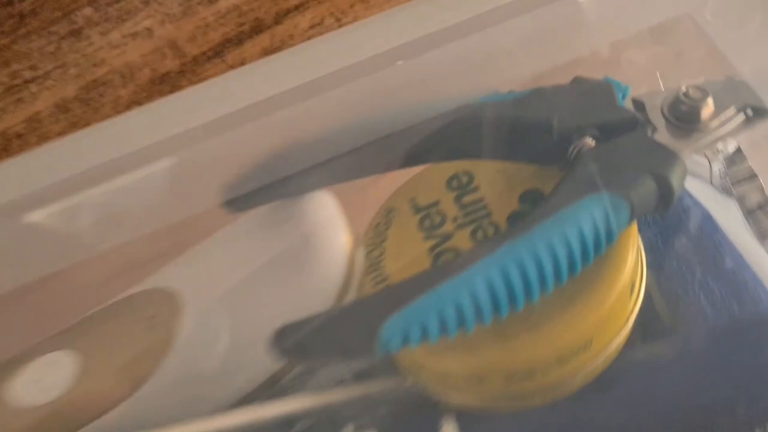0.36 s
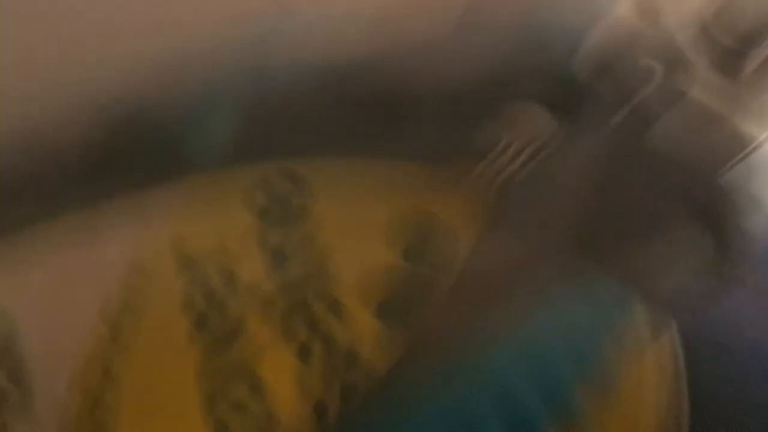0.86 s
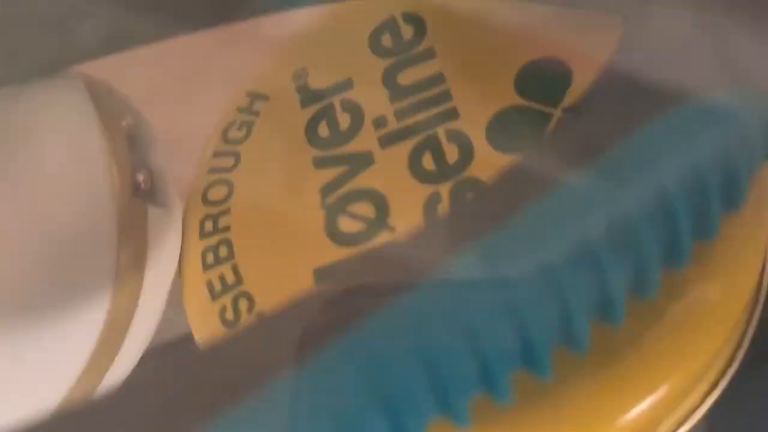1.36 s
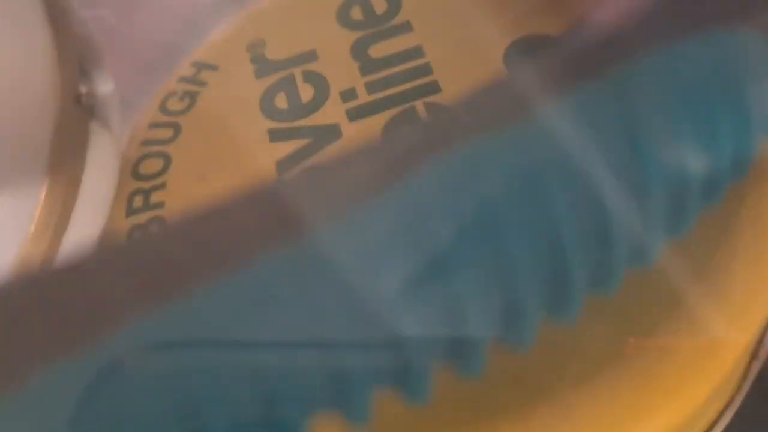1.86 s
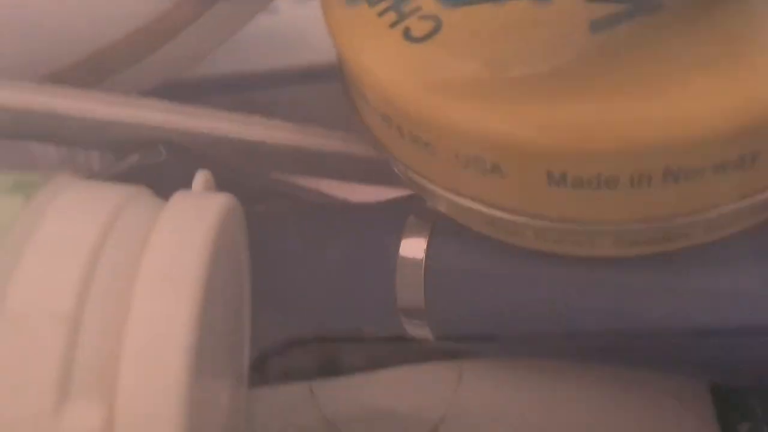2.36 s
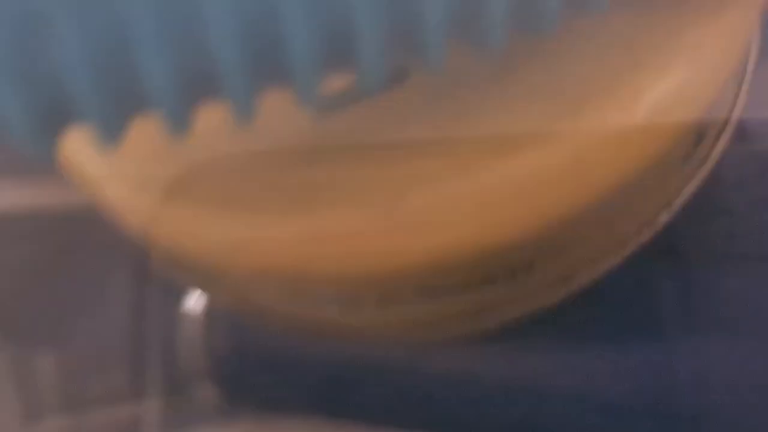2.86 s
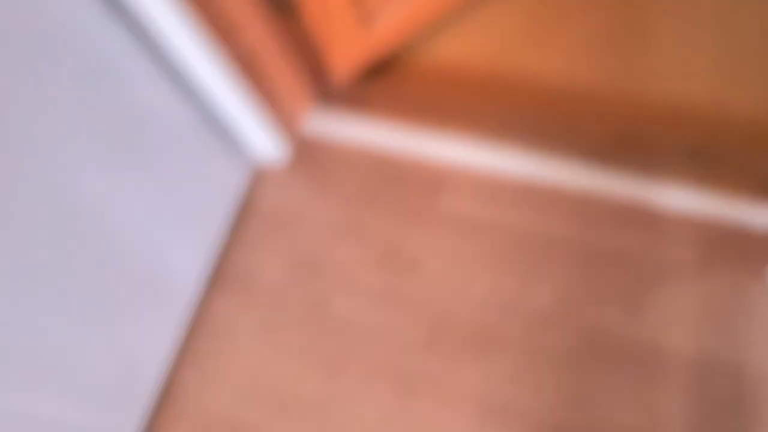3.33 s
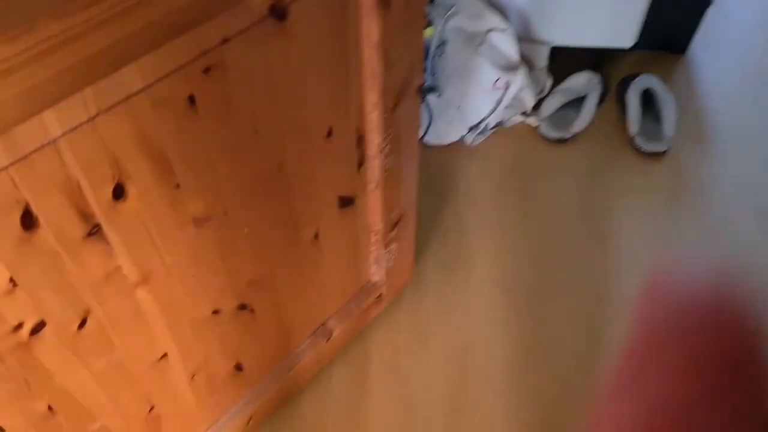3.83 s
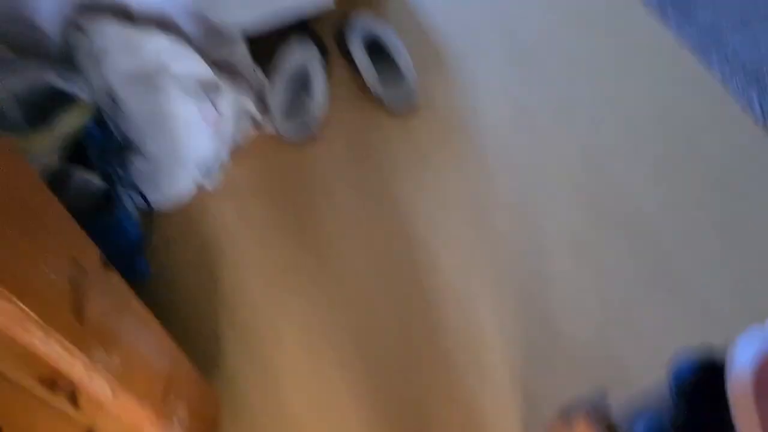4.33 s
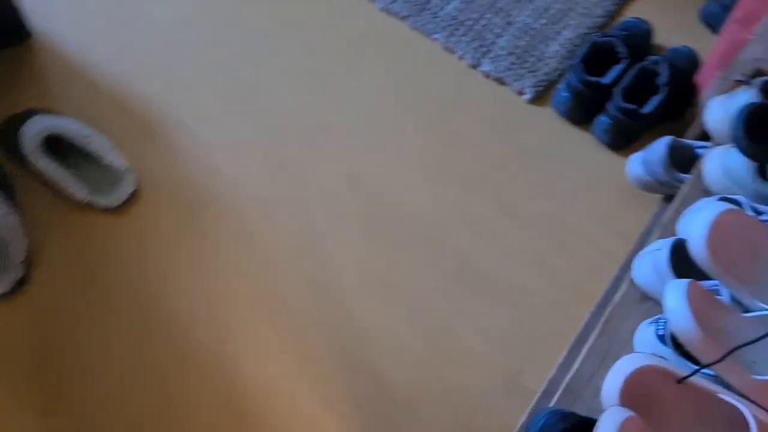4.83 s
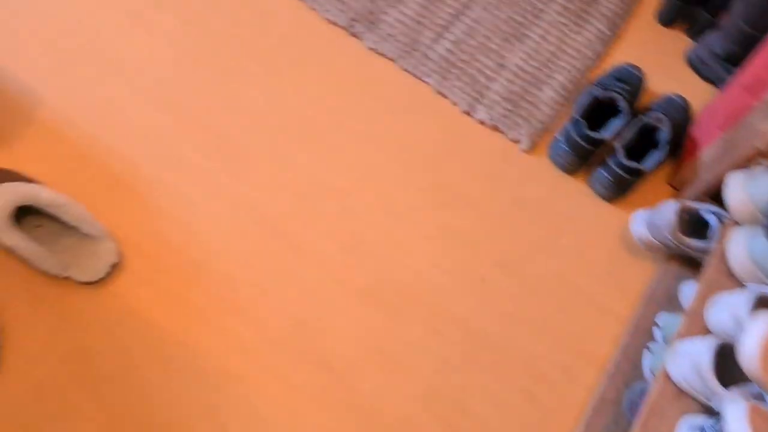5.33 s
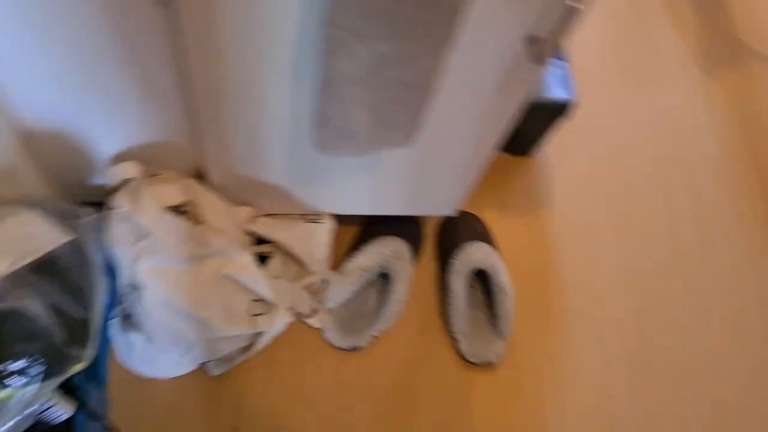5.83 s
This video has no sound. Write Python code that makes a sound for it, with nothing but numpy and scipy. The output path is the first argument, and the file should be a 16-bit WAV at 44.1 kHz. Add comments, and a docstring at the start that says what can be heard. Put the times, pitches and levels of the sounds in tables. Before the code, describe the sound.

Indoors, very close and rough: isolated hard clacks on hollow plastic, loose tools faintly tumbling, low handling rumble and skin or cloth scuffing. A short squeak, then a rapid run of knocks and ticks. Afterwards soft thumps, hissy rubbing and a strong pair of clacks; the box fades away, leaving a steady mains-like hum, soft air and a few plastic clicks. Hardly any room echo.

```python
"""A plastic box of small tools knocks dully and ticks as a hand-held recorder is moved over it, then into a hallway.
Blows swing hollow walls, contacts crack and ring short modes, and random bumps excite the box resonances.
The hand adds shaped noise: casing rumble, scuffing, fingers and cloth rubbing; gritty scrapes lead into
some contacts and one fingertip squeak slips by at a rising pitch.
An appliance hums near 100 Hz, twice the mains frequency, with a faint whine and soft air noise."""
import sys
import numpy as np
from scipy import signal
from scipy.fft import rfft, irfft, next_fast_len
from scipy.io import wavfile
from scipy.ndimage import uniform_filter1d, map_coordinates

SR = 44100
rng = np.random.default_rng(int(sys.argv[2]) if len(sys.argv) > 2 else 0)


def store_pcm(level_fs):
    """Save levels as 16-bit WAV."""
    pcm = np.round(np.clip(level_fs, -1, 1) * 32767).astype(np.int16)
    wavfile.write(sys.argv[1], SR, np.atleast_2d(pcm).T)


def natural_amplitude(level_db):
    """Convert a level in decibels to a linear amplitude factor, elementwise."""
    exponent = np.asarray(level_db, float) / 20
    return 10 ** exponent


N = 272967  # length [samples]
LAG_S = 0.00032  # near sounds reach the left microphone this much later


def unit(x):
    """Scaled to rms 1."""
    return x / np.sqrt(np.mean(x ** 2) + 1e-20)


def along(points, hz):
    """(frequency [Hz], value) points read on a log frequency axis."""
    f, v = np.transpose(points)
    return np.interp(np.log(hz + 1), np.log(f + 1), v)


def curves(rows):
    """One value per sample for each column after the time."""
    s, *cols = np.transpose(rows)
    return [np.interp(np.arange(N) / SR, s, c) for c in cols]


def wobble(rate):
    """A smooth random curve, rate knots a second."""
    knots = rng.standard_normal(int(N * rate / SR) + 4)
    return map_coordinates(knots, [np.arange(N) * rate / SR])


def filtered(x, response):
    """x shaped by a complex response of frequency."""
    m = next_fast_len(N + SR // 2)
    return irfft(rfft(x, m) * response(np.fft.rfftfreq(m, 1 / SR)), m)[..., :N]


def band(x, lo_hz, hi_hz):
    """Band-pass that also trims x to the scene's length."""
    sos = signal.butter(4, [lo_hz, hi_hz], "band", fs=SR, output="sos")
    return signal.sosfilt(sos, x[:, :N])


def swell(t, rise):
    """A smooth rise to 1 at t = rise and a longer fall."""
    return (t / rise) ** 2 * np.exp(2 - 2 * t / rise)


def held(start, length, db, rise, fall):
    """Gain of overlapping events that rise softly, hold for their length and die away; their powers add."""
    t = np.arange(0, N, 100) / SR
    on = (t - np.reshape(start, (-1, 1))) / rise
    off = np.maximum(t - np.reshape(start + length, (-1, 1)), 0) / fall
    gain = natural_amplitude(np.reshape(db, (-1, 1))) * np.exp(-np.logaddexp(0, -on) - off)
    return np.interp(np.arange(N) / SR, t, np.sqrt((gain ** 2).sum(axis=0)))


def panned(pan_db):
    """Left and right gains for a left-over-right level difference."""
    return natural_amplitude(np.array([pan_db, -pan_db]) / 2)


def add(out, s, sound, pan_db, lag):
    """Places a stereo sound at time s, the left side later by lag."""
    for side, wave, gain, start in zip(out, sound, panned(pan_db), (s + lag, s)):
        side[max(round(start * SR), 0):][:len(wave)] += gain * wave


# how alike noise is on both sides: (frequency [Hz], left-right likeness [0 to 1])
LIKENESS = [(60, 0.75), (300, 0.89), (700, 1), (3000, 0.08), (12000, 0.23)]


def rush(spectrum, lumps_db, rate, lag=0, patchy_db=0):
    """Stereo noise of rms 1, lumpy at rate a second, in drifting colour patches, partly alike on both sides."""
    z = signal.stft(rng.standard_normal((2, N)), nperseg=512)[2]
    field = rng.standard_normal(z.shape[1:])
    field = uniform_filter1d(uniform_filter1d(field, size=6, axis=0), size=9, axis=1)
    pair = signal.istft(z * natural_amplitude(patchy_db * unit(field)), nperseg=512)[1][:, :N]
    pair = pair * natural_amplitude(lumps_db * wobble(rate))

    def colour(hz):
        # the angle splits power between mid and side to set the likeness
        angle = np.arccos(np.clip(along(LIKENESS, hz), -1, 1)) / 2
        return natural_amplitude(along(spectrum, hz)) * [np.cos(angle), np.sin(angle)]

    mid, side = filtered(pair, colour)
    return unit(np.array([np.roll(mid + side, round(lag * SR)), mid - side]))


# how hard the hand moves the casing: (time [s], effort [dB], scuffing over effort [dB])
EFFORT = [(0, -49, -35), (.15, -52.5, -29), (.44, -49.5, -19), (.54, -39.5, -5), (.8, -34.5, -12),
          (1.2, -39, -18), (1.6, -43.5, -26), (1.72, -39.5, -13.5), (2.0, -44, -14.5), (2.4, -35.5, -10.5),
          (2.7, -36.5, -18.5), (2.83, -43, -10), (3.1, -28.5, -19), (3.5, -41.5, -17), (3.8, -38.5, -16),
          (4.25, -37.5, -9), (4.85, -42, -9), (5.05, -45.5, -2.5), (5.15, -46.5, -14), (5.65, -52, -7),
          (5.9, -48.5, -9), (6.19, -42.5, -4.5)]
# slow shoves of the casing: (start [s], length [s], level [dB])
SHOVES = [(.17, 0.042, -40), (.31, 0.039, -29), (0.47, 0.064, -43), (.74, 0.052, -48), (0.954, 0.069, -30),
          (1.14, 0.048, -49), (1.3, .07, -37), (1.81, 0.16, -39.5), (2.066, 0.16, -33), (2.284, 0.09, -21),
          (2.45, 0.13, -21), (2.654, 0.12, -34.5), (3.084, 0.19, -34.5), (3.39, .06, -44),
          (3.55, 0.073, -31), (3.68, 0.16, -38.5), (3.896, 0.066, -42), (4.243, 0.16, -37.5)]
# colour of the casing's rumble: (frequency [Hz], relative level [dB])
RUMBLE_COLOUR = [(8.8, -68), (15, -5.5), (32, -17.5), (43, -13.5), (120, -25.5), (160, -50), (260, -120)]


def rumbling():
    """The casing rumbles in low noise, steadily under the hand's effort and harder with each shove."""
    steady = natural_amplitude(curves(EFFORT)[0] - 9)
    shoves = held(*np.transpose(SHOVES), rise=0.027, fall=0.027)
    return np.hypot(steady, shoves) * rush(RUMBLE_COLOUR, lumps_db=3.5, rate=5.23)


# colour of the shaken body: (frequency [Hz], relative level [dB])
BODY_COLOUR = [(41, -39), (70, -3.5), (107, 5.5), (211, -2), (288, -6.5), (581, -22.5), (746, -31.5),
               (1200, -27.5), (1560, -54), (2640, -120)]
# colour of the scuffing: (frequency [Hz], relative level [dB])
SCUFF_COLOUR = [(260, -56), (450, -1), (520, -8), (571, -1.5), (1250, -4.5), (1800, -17), (2340, -31.5),
                (3960, -120)]


def shaking():
    """The grip shifts on the casing and each knock leaves the box shaking: dull body noise and scuffing."""
    effort_db, scuff_db = curves(EFFORT)
    knock_s, knock_db = np.transpose(KNOCKS)[:2]
    # 0.68 dB of shaking for each dB of knock; falls by e in 28 ms
    shake = held(knock_s, 0, 0.68 * knock_db, rise=0.005, fall=0.028)
    body = np.hypot(natural_amplitude(effort_db), natural_amplitude(-16) * shake)
    body = body * rush(BODY_COLOUR, lumps_db=1.8, rate=45, patchy_db=2.2)
    scuff = np.hypot(natural_amplitude(effort_db + scuff_db), natural_amplitude(-30) * shake)
    scuff = scuff * rush(SCUFF_COLOUR, lumps_db=1.5, rate=90, lag=LAG_S, patchy_db=1.8)
    return body + scuff


# where the hand works, seen from the microphone pair: (time [s], left over right [dB])
HAND = [(0, 8), (.1, -14.5), (.9, -5.5), (1.2, -14.5), (1.7, -18.5), (2.3, -18.5), (2.8, -14), (3.1, -7.5),
        (3.5, -5), (3.75, -20), (4.05, -1.5), (4.3, -19.5), (4.45, -4), (5.2, -4.5), (5.7, -10.5),
        (6.19, 7.5)]
# skin and cloth strokes: (start [s], length [s], relative rubbing [dB], relative sheen over rubbing [dB])
STROKES = [(0.15, 0.27, -69.5, -17), (0.472, 0.054, -50.5, -10.5), (0.572, 0.19, -46, -11.5),
           (0.808, 0.18, -44, -12), (1.003, 0.13, -54.5, -22.5), (1.11, 0.15, -58.5, -11),
           (1.347, 0.036, -54.5, -11), (1.435, 0.053, -59, -15), (1.625, 0.18, -57, -29.5),
           (1.875, 0.054, -48, -20), (2.042, 0.19, -50.5, -12.5), (2.314, 0.23, -55, -2.5),
           (2.52, 0.23, -56, -8), (2.856, 0.11, -51.5, -0.5), (3.012, 0.088, -45.5, -2.5),
           (3.167, 0.088, -45, -6.5), (3.353, 0.14, -46, -5.5), (3.589, .1, -58.5, -5.5),
           (3.785, 0.056, -57.5, -13), (3.934, 0.054, -44.5, 3.5), (4.021, 0.16, -50, 2.5),
           (4.226, 0.05, -57.5, -2), (4.387, 0.18, -56, -1), (4.625, 0.073, -67, -1.5),
           (4.854, 0.045, -62.5, -6.5), (4.987, 0.31, -64.5, -3), (5.205, 0.051, -51, -5),
           (5.333, 0.15, -52, -2), (5.563, 0.058, -64.5, -3), (5.984, 0.088, -60, 3), (6.09, .12, -55.5, 0)]
# colour of the rubbing: (frequency [Hz], relative level [dB])
RUBBING_COLOUR = [(710, -8.5), (1200, -2.5), (2110, -3.5), (2850, -3.5), (3500, 3), (3950, -1), (4890, -5),
                  (6510, -48), (8000, -29.5), (10400, -36), (17600, -120)]
# colour of its bright sheen: (frequency [Hz], relative level [dB])
SHEEN_COLOUR = [(2940, -26.5), (5000, -6.5), (5460, -7), (6470, -13.5), (10400, -12.5), (12400, -17),
                (15200, -20), (16000, -8)]
# narrow hiss while skin slides on the casing: (start [s], length [s], level [dB])
WHISTLE = [(1.62, 0.33, -72), (2.1, 0.12, -57), (2.35, 0.26, -64.5)]
# colour of that hiss: (frequency [Hz], relative level [dB])
WHISTLE_COLOUR = [(7600, -40), (8600, -4), (9400, 0), (10200, -4), (11500, -40)]


def rubbing():
    """Skin and cloth slide on the casing: strokes of noise in three bands that share one stick and slip."""
    def stroke(start, length, db):
        return held(start, length, db, rise=0.024, fall=0.033)

    start, length, rub_db, sheen_db = np.transpose(STROKES)
    # the resting levels remain because the skin never quite leaves the casing
    rub = np.hypot(natural_amplitude(-76), stroke(start, length, rub_db + 3.0))
    rub = rub * rush(RUBBING_COLOUR, lumps_db=2.0, rate=660, lag=LAG_S, patchy_db=1.5)
    sheen = np.hypot(natural_amplitude(-74.5), stroke(start, length, rub_db + sheen_db + 4.5))
    sheen = sheen * rush(SHEEN_COLOUR, lumps_db=1.5, rate=170, lag=LAG_S, patchy_db=1.0)
    whistle = stroke(*np.transpose(WHISTLE)) * rush(WHISTLE_COLOUR, lumps_db=1.5, rate=100, lag=LAG_S)
    stick_slip = natural_amplitude(1.5 * wobble(40))
    return stick_slip * panned(curves(HAND)[0]) * (rub + sheen + whistle)


# what the bumps ring in the box: (resonance [Hz], width [Hz], relative level [dB])
HOLLOW = [(340, 70, 3), (455, 103, 0.5), (600, 88, -4), (810, 140, -11)]


def tumbling():
    """Loose tools bump the box at random and ring its resonances, harder when the hand works harder."""
    rate, spread_db = 120, 3  # bumps a second, scatter of their size
    left_s, fade_db_per_s = 3.72, 26  # the box is left behind from here on
    when, size, pan = rng.random((round(rate * N / SR), 3)).T
    bumps = np.zeros((2, N))
    bumps[:, (when * N).astype(int)] = natural_amplitude(-spread_db * np.log(size)) * np.array([pan, 1 - pan])

    def box(f):
        total = 0
        for k, (centre, width, db) in enumerate(HOLLOW):
            resonance = 1j * f * width / (centre * centre - f * f + 1j * f * width)
            total = total + (-1) ** k * natural_amplitude(db) * resonance  # neighbours in opposite phase
        return total / (1 + (f / 900) ** 2)

    fade_db = fade_db_per_s * np.maximum(np.arange(N) / SR - left_s, 0)
    return natural_amplitude(curves(EFFORT)[0] - 8 - fade_db) * unit(filtered(bumps, box))


# hum, louder once clear of the box: (time [s], level [dB])
HUM = [(0, -43), (.45, -46), (.6, -73), (1.4, -46), (1.8, -87), (2.5, -54), (3.8, -41), (4.3, -40.5),
       (6.19, -40.5)]
# faint motor whine heard in the hallway: (time [s], level [dB])
WHINE = [(0, -80), (5.1, -74), (5.6, -62), (6.19, -62)]
# colour of the house air: (frequency [Hz], relative level [dB])
AIR_COLOUR = [(71, -16.5), (120, -6), (147, 8), (295, -14.5), (402, -16), (463, -34), (805, -13.5),
              (1120, -17), (1490, -25.5), (2640, -15.5), (16000, -70.5)]


def appliance():
    """A slightly unsteady hum and whine, each with its octave, over the soft air noise of the house."""
    phase = 2 * np.pi * np.cumsum(99.8 + 1.58 * wobble(7.6)) / SR
    hum = np.sin(phase) + natural_amplitude(-21.5) * np.sin(2 * phase)
    hum = np.sqrt(2) * natural_amplitude(curves(HUM)[0] + 0.42 * wobble(33)) * hum
    turn = 2 * np.pi * np.cumsum(580 + 12 * wobble(40)) / SR
    whine = np.sin(turn) + natural_amplitude(-10) * np.sin(2 * turn)
    whine = natural_amplitude(curves(WHINE)[0] + 1.7 * wobble(23)) * whine
    return hum + whine + natural_amplitude(-57.5) * rush(AIR_COLOUR, lumps_db=4.0, rate=15)


# hard contacts: (time [s], relative level [dB], ring pitch [Hz], relative treble [dB], relative scatter [dB])
TICKS = [(0.0308, -29.5, 2300, -20, -22), (0.139, -46, 3100, -24, -29), (0.192, -44, 2480, -31, -8),
         (0.311, -24.5, 1970, -42, -9.5), (0.3164, -11, 2240, -58, -40), (0.3783, -37.5, 2800, -6, -23),
         (0.4785, -9, 1540, -23.5, -27), (0.4879, -24.5, 2270, -15, -10), (0.9126, -1.5, 1490, -16.5, -16),
         (1.033, -23, 2920, -21, -9.5), (1.1612, -16, 1670, -42, -13.5), (1.169, -25, 1960, -23, -19),
         (1.2078, -27, 1680, -40, -25), (1.283, -39, 1010, -27, -26), (1.385, -20.5, 2570, -33, -40),
         (1.4822, -42, 2180, -11, -7.5), (1.5272, -39.5, 1810, -23, -18), (1.547, -44, 2610, -37, -3),
         (1.688, -22.5, 3260, -14, -11), (1.697, -26, 3500, -38, -30), (1.7355, -34, 3700, -29, -23),
         (1.7578, -28.5, 2380, -24, -8.5), (1.831, -29.5, 3280, -32, -11), (1.9721, -29.5, 3750, 1, -18),
         (2.0131, -34.5, 1890, -17, -4.5), (2.077, -17.5, 1740, -16.5, -6), (2.0936, -17.5, 1980, -6, -20),
         (2.1213, -14, 2140, -13.5, -10.5), (2.149, -24.5, 2060, -6, -17), (2.163, -18.5, 2100, -25, -26),
         (2.1825, -18, 1680, -15, -20), (2.196, -23.5, 2150, -31, -9), (2.222, -26.5, 2580, -11, -9),
         (2.238, -26.5, 4070, -10, -30), (2.3212, -23, 2710, -11.5, -3.5), (2.3279, -22.5, 1690, -18, -31),
         (2.3857, -26, 2280, -18, -11), (2.4621, -29.5, 1540, -9, -7), (2.5751, -16.5, 3020, -2.5, -16),
         (2.608, -31.5, 2360, -26, -4), (2.7572, -24, 2960, -3, -12), (2.7892, -26.5, 3470, -15, -16),
         (3.0602, -17.5, 3800, -19, -27), (3.0739, -22.5, 3320, -8, -27), (3.1356, -21.5, 3620, -17, -30),
         (3.4427, -21, 4060, -19, -21), (3.5054, -34, 3440, -18, -1), (3.5426, -33, 1630, -34, -4),
         (3.6505, -34.5, 3410, -14, -14), (3.8992, -4, 2630, -6.5, -20.5), (3.9643, -8.5, 2600, -18, -18),
         (3.9872, -21, 2250, -8, -25), (4.236, -38.5, 2100, -5, -3), (4.31, -36.5, 3430, -2, -10.5),
         (4.3903, -31.5, 2300, -11, -19), (4.4395, -25.5, 1900, -32, -36), (4.4451, -17, 4830, -14, -41),
         (4.703, -38, 4400, -5, -28), (5.206, -4.5, 2860, -3.5, -14.5), (5.2128, -18.5, 3000, -10.5, 4),
         (5.407, -32.5, 1760, -5, -5), (5.45, -32.5, 1810, -17, -8), (5.6827, -13, 3400, -11, -38),
         (5.9707, -39, 1070, -26, -25), (6.06, -31, 2000, -21, -4.5)]
# low modes that every hard contact excites: (pitch [Hz], mean relative level [dB], t60 [s])
LID = [(670, -22, 0.011), (1250, -11, 0.016)]


def ticks():
    """Parts scrape together, then a sharp contact cracks and rings short modes; loose parts scatter noise after."""
    ring, mellow, bright = np.zeros((3, 2, N + SR))
    t = np.arange(-SR // 50, SR // 8) / SR  # contact at 0
    after = np.maximum(t, 0)
    for s, db, hz, treble_db, scatter_db in TICKS:
        pan_db = np.interp(s, *np.transpose(HAND))
        shared, *own = rng.standard_normal((3, len(t)))
        noise = 0.18 * shared + 0.45 * np.array(own)
        approach = (t < 0) * natural_amplitude(scatter_db + 2.0 + 60 * t / 0.02)
        crack = swell(after, 0.00033) + approach
        onset = 1 - np.exp(-after / 0.00047)
        long_scatter = natural_amplitude(scatter_db - 60 * after / 0.12) * onset
        short_scatter = natural_amplitude(scatter_db - 60 * after / 0.046) * onset  # treble dies first
        tone = np.sin(2 * np.pi * hz * after) * swell(after, 0.00015)
        for lid_hz, level_db, t60 in LID:
            decay = natural_amplitude(level_db + rng.normal(0, 1.54) - 60 * after / t60)
            tone = tone + decay * np.sin(2 * np.pi * lid_hz * after)
        start = s + t[0] - .0004
        add(ring, start, natural_amplitude(db) * np.array([tone, tone]), pan_db, LAG_S)
        add(mellow, start, natural_amplitude(db + 3.5) * noise * (crack + long_scatter), pan_db, LAG_S)
        add(bright, start, natural_amplitude(db + treble_db + 2.5) * noise * (crack + short_scatter), pan_db, LAG_S)
    return band(ring, 260, 5900) + band(mellow, 374, 4390) + band(bright, 6800, 13600)


# decay of the room: (frequency [Hz], t60 [s])
HALL = [(200, 0.38), (2000, 0.24), (10000, 0.34)]


def hall(x):
    """The room answers in noise, each frequency dying at its own speed."""
    hz, t, z = signal.stft(rng.standard_normal((2, SR // 2)), SR, nperseg=256)
    decay = natural_amplitude(-60 * t / along(HALL, hz)[:, None])
    tail = signal.istft(z * decay, SR, nperseg=256)[1]
    late = np.pad(x, (300, 0))[None]  # the answer starts 300 samples late
    return signal.fftconvolve(late, tail / np.linalg.norm(tail[0]), axes=1)[:, :N]


# parts grating ever harder up to a contact: (end [s], length [s], peak level [dB])
SCRAPES = [(0.319, 0.028, -32), (0.479, 0.012, -34), (.91, 0.011, -35), (1.382, 0.048, -43),
           (1.7, 0.046, -50), (2.071, 0.026, -42), (3.956, 0.032, -44)]
# colour of the grating: (frequency [Hz], relative level [dB])
GRATE_COLOUR = [(500, -40), (1100, -14), (1700, 0), (2100, -5), (2600, -6), (3100, -9), (4200, -20),
                (7000, -60)]


def scrapes():
    """Parts grate against each other: gritty noise that swells towards a contact and stops there."""
    t = np.arange(N) / SR
    gain = np.zeros(N)
    for end, length, db in SCRAPES:
        gain += natural_amplitude(db) * np.clip(1 - (end - t) / length, 0, 1) * (t < end)
    grit = rush(GRATE_COLOUR, lumps_db=5, rate=500, lag=LAG_S, patchy_db=3)
    return gain * panned(curves(HAND)[0]) * grit


# dull knocks on hollow plastic:
# (time [s], relative level [dB], pitch [Hz], relative rise [s], left over right [dB])
KNOCKS = [(0.315, -29.5, 287, 0.00049, -6), (0.342, -21, 207, 0.0034, -0.5), (0.476, -7, 200, 0.0013, -4),
          (0.488, -15.5, 193, 0.0016, -5), (0.501, -29, 258, 0.0014, -7), (0.738, -23, 230, 0.0019, -11),
          (0.916, 0.5, 230, 0.0021, 7), (0.965, -16.5, 211, 0.0013, -5), (1.02, -28.5, 239, 0.0007, 7),
          (1.037, -21.5, 287, 0.0039, -5), (1.087, -22.5, 320, 0.004, -1.5),
          (1.162, -4.5, 258, 0.0039, -5.5), (1.387, -24, 663, 0.00198, 1), (1.394, -19.5, 188, 0.0023, 4),
          (1.484, -34.5, 642, 0.0033, -6), (1.55, -43.5, 600, 0.0034, -5), (1.69, -29.5, 304, 0.0029, 1),
          (2.073, -1.5, 336, 0.0013, -5), (2.086, -16.5, 535, 0.0031, -8), (2.101, -6.5, 258, 0.0015, 3.5),
          (2.124, -11, 252, 0.00088, -10), (2.152, -10, 248, 0.00075, 5.5), (2.198, -20, 290, 0.0016, 5),
          (2.222, -15, 383, 0.0013, -5), (2.244, -23, 277, 0.0026, 6), (2.322, -6.5, 193, 0.0048, 2.5),
          (2.334, -16, 285, 0.0027, 5), (2.38, -18.5, 254, 0.0028, 2), (2.477, -21.5, 216, 0.0026, 7),
          (2.579, -30, 210, 0.0036, -14), (2.875, -27, 374, 0.0035, 6), (2.936, -23.5, 268, 0.0017, 14),
          (2.985, -29.5, 453, 0.0017, 6), (3.027, -19.5, 267, 0.0013, 5), (3.064, -15, 209, 0.0029, 8),
          (3.109, -28, 242, 0.0013, 22), (3.122, -22, 343, 0.002, 9), (3.24, -27, 292, 0.0066, 5),
          (3.29, -22, 372, 0.0014, 7), (3.443, -28.5, 326, 0.0035, 5), (3.508, -22.5, 340, 0.0012, 6),
          (3.548, -27, 388, 0.0055, 2.5), (3.901, -7.5, 196, 0.0032, -4.5), (3.965, -7, 423, 0.00068, -2),
          (5.039, -42, 720, 0.0035, 3), (5.218, -24.5, 323, 0.0062, -2), (5.229, -30, 518, 0.00385, 0),
          (6.027, -40.5, 520, 0.0027, 8)]
# band of the jostled contents: (edge frequency [Hz])
JOSTLE_BAND = [170, 640]


def knocks():
    """A soft blow swings the hollow wall; a higher mode and a slow shove differ by side, then contents jostle."""
    out, jostle = np.zeros((2, 2, N + SR))
    t = np.arange(SR // 8) / SR

    def mode(hz, rise):
        return np.sin(2 * np.pi * hz * t) * swell(t, rise)

    for s, db, hz, rise, pan_db in KNOCKS:
        rise = max(rise, .0005)
        wall = mode(hz, 1.15 * rise)
        # pitch ratios to the wall, drawn for each side
        upper, lower = rng.normal([[1.9], [.4]], [[.2], [.06]], (2, 2))
        sides = []
        for up, low in zip(upper, lower):
            higher = natural_amplitude(-9) * mode(hz * up, 0.36 * rise)
            shove = natural_amplitude(-11.0) * mode(hz * low, 2.57 * rise)
            sides.append(higher + shove)
        add(out, s - 1.083 * rise, natural_amplitude(db + 1.5) * (wall + np.array(sides)), pan_db, 0)
        shared, *own = rng.standard_normal((3, len(t)))
        contents = swell(t, 0.0034 + 1.13 * rise) * (0.61 * shared + 0.15 * np.array(own))
        add(jostle, s, natural_amplitude(db + 2) * contents, pan_db, 0)
    return out[:, :N] + band(jostle, *JOSTLE_BAND)


# a fingertip dragged on plastic: (time [s], pitch [Hz], level [dB])
SQUEAK = [(1.76, 600, -70), (1.78, 680, -51), (1.81, 830, -47), (1.84, 890, -49), (1.855, 910, -70)]


def squeak():
    """A dragged fingertip sticks and slips at a rising, unsteady rate, with a weak third harmonic."""
    hz, db = curves([(0, 410, -120)] + SQUEAK + [(2, 930, -120)])
    phase = 2 * np.pi * np.cumsum(hz * (1 + .045 * wobble(200))) / SR
    tone = np.sin(phase) + natural_amplitude(-11) * np.sin(3 * phase)
    return natural_amplitude(db + 3 * wobble(80)) * tone * natural_amplitude([[-5], [3]])  # towards the right


def scene():
    """Blows with a little room, handling noise, scrapes, tumbling tools, a squeak and the appliance."""
    handling = rumbling() + shaking() + rubbing()
    background = tumbling() + appliance()
    blows = ticks() + knocks()
    room = natural_amplitude(-32.0) * hall(blows.mean(axis=0))
    return handling + background + blows + room + scrapes() + squeak()


def low_pass(x):
    """Removes everything above the highest recorded frequency."""
    return signal.sosfilt(signal.butter(12, 17000, fs=SR, output="sos"), x)


def record(dry):
    """A steep band limit at 15.5 kHz, then clipping at full scale."""
    limited = filtered(dry, lambda hz: 1 / (1 + (hz / 15500) ** 40))
    mix = np.clip(limited, -1, 1)
    return low_pass(mix)


dry = scene()
out = record(dry)
store_pcm(out)
```